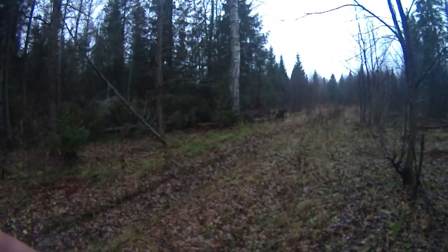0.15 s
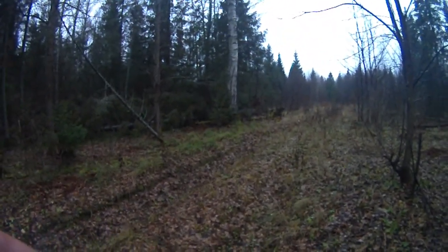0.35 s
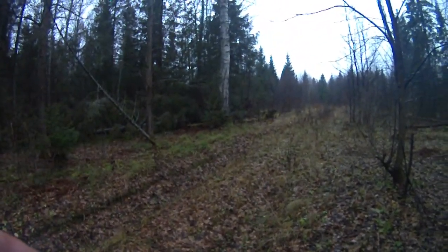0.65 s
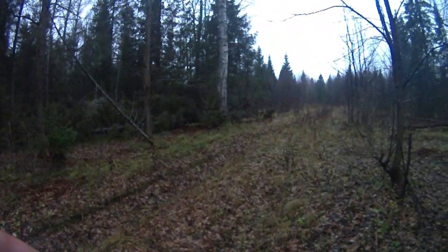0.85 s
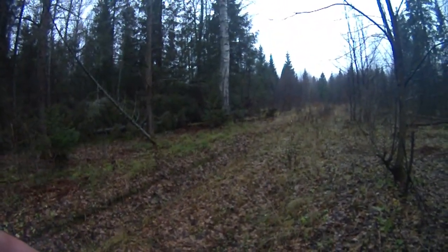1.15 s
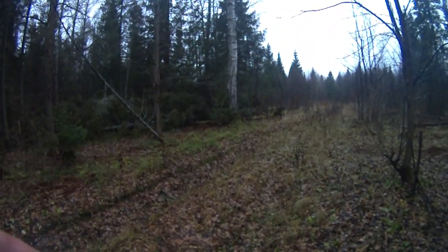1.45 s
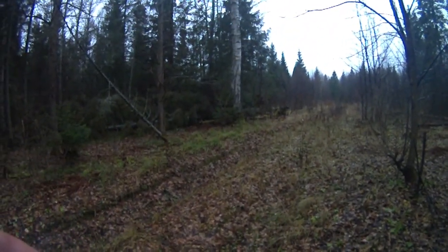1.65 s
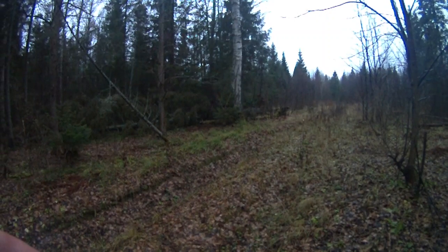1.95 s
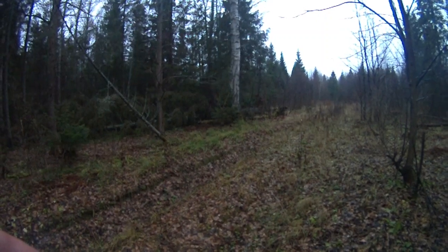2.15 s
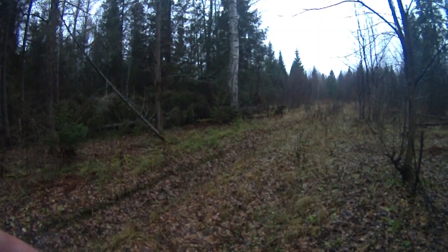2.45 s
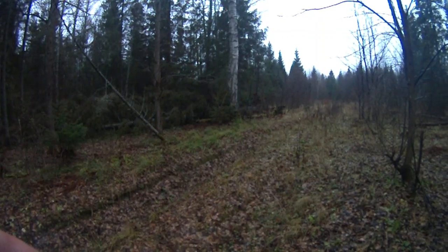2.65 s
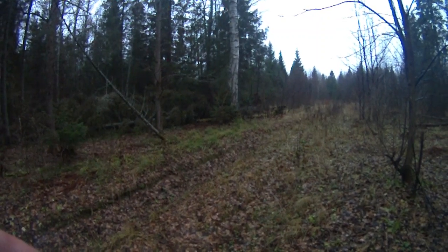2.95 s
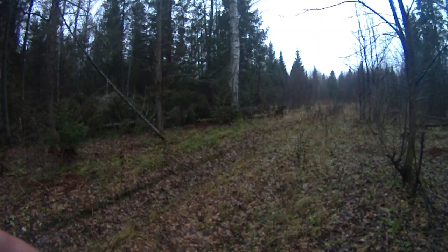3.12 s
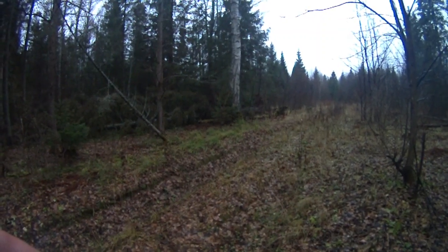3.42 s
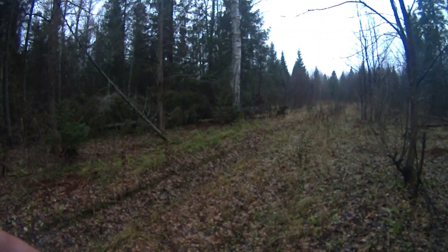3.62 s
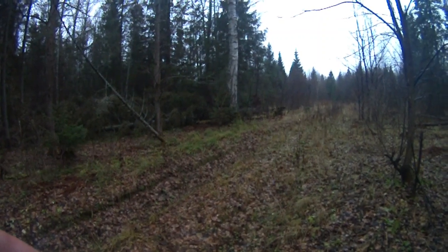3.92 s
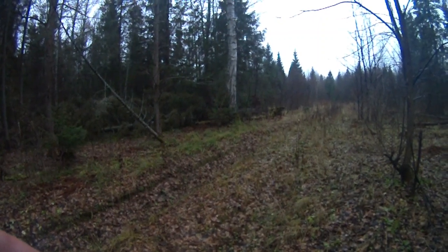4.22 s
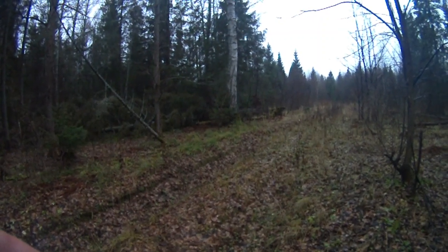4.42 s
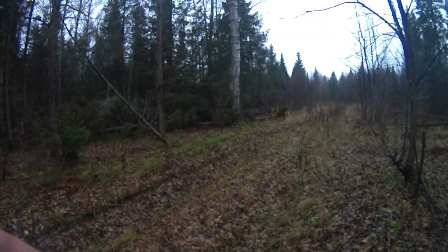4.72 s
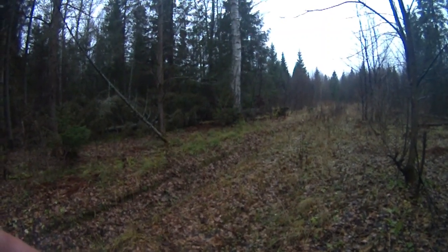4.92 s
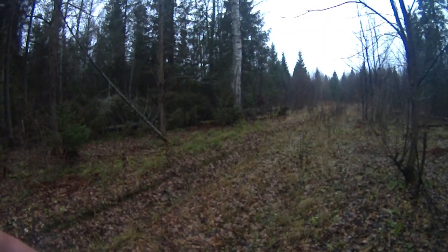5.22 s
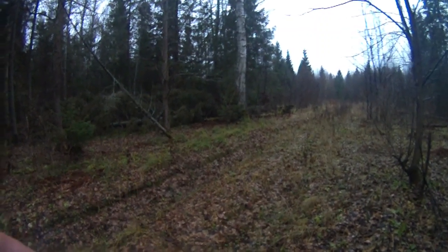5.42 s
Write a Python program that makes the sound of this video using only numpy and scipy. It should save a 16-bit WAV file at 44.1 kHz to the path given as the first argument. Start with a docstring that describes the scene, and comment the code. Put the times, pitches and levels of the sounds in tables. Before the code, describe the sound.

A faint, steady forest murmur and soft microphone hiss run throughout, with a barely audible high whistle. A small dull tap comes at the very start, over a fading echo. Far away, a hound gives short, slightly hoarse yelps at about 0.3, 0.7, 1.6, 2.1, 2.6 and 3.4 seconds. Most drop in pitch at the end; all are muffled by distance and leave a long echo among the trees. Two tiny dry ticks occur near 0.6 seconds and a brief, faint low hum near 1.1. After a pause, the dog yelps again at 4.5 seconds, gives a slightly longer, weaker call around 5.1, and one more faint yelp just before 5.5. At 5.5 seconds a small catch snaps shut close to the microphone, a sharp click with a very brief ring that stands out against the distant dog.

```python
"""Distant hound in the woods

A hound bays far off among the trees: short yelps, most of them falling, each answered by the forest
edge and a long tail scattered from the trunks. The woods murmur and the microphone pair hisses, with
a faint whistle, hum and ticks. At the end a catch snaps shut close by, its modes ringing briefly."""
import sys
import numpy as np
from scipy import signal
from scipy.fft import rfft, irfft, next_fast_len
from scipy.io import wavfile

SR = 44100
rng = np.random.default_rng(int(sys.argv[2]) if len(sys.argv) > 2 else 0)


def wav_record(signal):
    """Record a signal, one row per channel, as 16-bit PCM in the file named by sys.argv[1]."""
    frames = np.transpose(np.atleast_2d(signal))
    bounded = np.clip(frames, -1, 1)
    # unit amplitude maps onto the largest positive 16-bit level
    quanta = np.round(bounded * 32767).astype(np.int16)
    wavfile.write(sys.argv[1], SR, quanta)


N = 245725
TIME = np.arange(N) / SR
PATH_TIME = np.arange(3 * SR) / SR   # an echo path is over after three seconds


def from_db(db):
    """Decibels to amplitude."""
    return 10 ** (np.asarray(db) / 20)


def rms_one(x):
    """The signal scaled to rms 1."""
    return x / np.sqrt(np.mean(x ** 2))


def at_hz(points, hz):
    """A curve of (frequency, value) points, read along a logarithmic frequency axis."""
    frequencies, values = np.array(points).T
    return np.interp(np.log(hz), np.log(frequencies), values)


def filtered(x, order, hz, kind="low"):
    """A maximally flat filter, low-pass by default."""
    return signal.sosfilt(signal.butter(order, hz, kind, fs=SR, output="sos"), x)


def wobble(hz):
    """Slow noise of rms 1, changing mostly below hz."""
    return rms_one(filtered(rng.standard_normal(N), 2, hz))


def ring(drive, hz, t60):
    """A damped mode: a unit click sets a sine of height 1 ringing."""
    radius, angle = from_db(-60 / (t60 * SR)), 2 * np.pi * hz / SR
    return signal.lfilter([0, np.sin(angle)], [1, -2 * radius * np.cos(angle), radius ** 2], drive + 1e-18)


def stereo_noise(spectrum):
    """Noise of rms 1 with this spectrum, the sides as alike as the microphone pair makes them."""
    # width of the pair: f/Hz, side against mid/dB
    side_level = [(25, -36), (60, -29), (150, -27.5), (400, -23.5), (1000, -22.5), (2500, -7.5),
                  (5000, -5.5), (9000, -3.5), (14000, -4.5)]
    size = next_fast_len(N)
    hz = np.fft.rfftfreq(size, 1 / SR).clip(1)
    mid, side = rfft(rng.standard_normal((2, size)))
    pair = mid + from_db(at_hz(side_level, hz)) * side * [[1], [-1]]
    return rms_one(irfft(pair * from_db(at_hz(spectrum, hz)), size)[:, :N])


def microphone_hiss(level_db=-60):
    """The steady noise of the microphones themselves."""
    # hiss spectrum: f/Hz, relative density/dB
    spectrum = [(700, -23), (1500, 1), (2500, -2), (5000, -6), (10000, -11.5), (15400, -12.5)]
    return from_db(level_db) * stereo_noise(spectrum)


def woods_murmur(level_db=-55):
    """The far murmur of the woods, strongest in the low middle."""
    # murmur spectrum: f/Hz, relative density/dB
    spectrum = [(18, -52), (30, -26), (110, -19.5), (200, -9.5), (350, -3), (480, -1), (800, -8.5),
                (1100, -8), (1500, -16.5), (2200, -25.5), (4000, -27)]
    return from_db(level_db) * stereo_noise(spectrum)


def faint_whistle(hz=11145, level_db=-84):
    """A thin, high whistle: noise in one narrow resonance."""
    return from_db(level_db) * rms_one(ring(rng.standard_normal(N), hz, t60=0.042))


def short_hum(start_s=1.09, end_s=1.21, hz=212, level_db=-56):
    """A low tone swells and fades once."""
    arch = np.sin(np.pi * np.clip((TIME - start_s) / (end_s - start_s), 0, 1))
    return from_db(level_db) * arch * np.sin(2 * np.pi * hz * TIME)


def ticks():
    """A dull tap and two dry ticks, each a tone under a very short bell-shaped envelope."""
    # tap and ticks: t/s, f/Hz, level/dB, half length/s
    pulses = [(.0237, 640, -30.5, 0.00083), (.6255, 6690, -47, 0.00043), (0.635, 7380, -46, 0.00042)]
    out = np.zeros(N)
    for at_s, hz, level_db, half_s in pulses:
        t = TIME - at_s
        out += from_db(level_db) * np.exp(-(t / half_s) ** 2) * np.cos(2 * np.pi * hz * t)
    return out


def catch(contact_hz=3520, bass_cut_hz=1050):
    """Close by, each contact rings all modes through a short soft pulse; so small a part has no bass."""
    # contacts of the catch: t/s, level/dB
    snaps = [(5.4804, -37), (5.5057, -8)]
    # its modes: f/Hz, level/dB, t60/s
    modes = [(1065, -4, 0.0061), (1310, -5.5, 0.022), (1850, 3, 0.011), (2087, -3, 0.021),
             (2480, -5.5, 0.024), (3070, -6.5, 0.0096), (3570, -9.5, 0.014), (4460, -14, 0.0086),
             (5550, -12.5, 0.0079), (6040, -15.5, 0.012), (7080, -13, 0.0087), (11000, -3.5, 0.0051)]
    clicks = np.zeros(N)
    for at_s, level_db in snaps:
        clicks[round(at_s * SR)] = from_db(level_db)
    pulses = filtered(clicks, 2, contact_hz)
    ringing = sum(from_db(level_db) * ring(pulses, hz, t60) for hz, level_db, t60 in modes)
    return filtered(ringing, 6, bass_cut_hz, "high")


def forest_tail(time):
    """Noise that dies band by band as the trunks scatter and swallow it."""
    # decay among the trees: f/Hz, t60/s
    decay = [(300, 0.83), (600, 1.65), (1000, 2.4), (1600, 3.8), (2400, 0.3)]
    out, edges_hz = 0, 200 * 2 ** np.arange(0, 4.1, .5)
    for low, high in zip(edges_hz, edges_hz[1:]):
        band = filtered(rng.standard_normal(len(time)), 2, [low, high], "band")
        out += band * from_db(-60 * time / at_hz(decay, np.sqrt(low * high)))
    return out


def scatter(delay_s, t60):
    """A cluster of reflections from many trunks."""
    after = PATH_TIME - delay_s
    return rng.standard_normal(len(after)) * (after > 0) * from_db(-60 * np.abs(after) / t60)


def forest(yelp, near_db=-12, edge_db=-9, tail_db=-3.5):
    """Direct sound, near trunks, far edge and long tail; the hound runs, so each yelp finds new paths."""
    out = np.pad(yelp, (0, len(PATH_TIME) - 1))
    near, edge = scatter(delay_s=.004, t60=.15), scatter(delay_s=.084, t60=.51)
    for path, level_db in (near, near_db), (edge, edge_db), (forest_tail(PATH_TIME), tail_db):
        echo = signal.fftconvolve(yelp, path)
        # each level is the echo's energy against the direct sound
        out += from_db(level_db) * echo * np.sqrt(np.sum(yelp ** 2) / np.sum(echo ** 2))
    return out


def throat(x):
    """The hound's throat: parallel resonances, each applied twice so that the valleys stay dark."""
    # resonances: f/Hz, width/Hz, level/dB
    formants = [(534, 190, 7.5), (895, 434, 3.5), (1500, 890, -31)]
    out = 0
    for hz, width_hz, level_db in formants:
        radius, angle = np.exp(-np.pi * width_hz / SR), 2 * np.pi * hz / SR
        gain = (1 - radius ** 2) / 2
        section = [gain, 0, -gain, 1, -2 * radius * np.cos(angle), radius ** 2]
        out += from_db(level_db) * signal.sosfilt([section, section], x)
    return out


def lingering_tail(opening_db=-53):
    """Yelps already dying away among the trees at the start: a throat-coloured forest tail."""
    tail = throat(forest_tail(TIME))
    return from_db(opening_db) * tail / np.std(tail[:SR // 10])


def yelp_pitch(t, first_hz, held_hz, last_hz, break_s, settle_s=.028, break_length_s=.04, sag_share=.2):
    """The voice settles from the first pitch, drifts while held, then breaks to the last."""
    broken = np.clip((t - break_s) / break_length_s + .5, 0, 1)
    sag = sag_share * np.minimum(t / break_s, 1)
    step = (1 - sag_share) * broken ** 2 * (3 - 2 * broken)
    return held_hz + (first_hz - held_hz) * np.exp(-t / settle_s) + (last_hz - held_hz) * (sag + step)


def swell(t, level_db, slopes, from_s, until_s=None):
    """Gain that rises to full at from_s, holds if until_s is given, and fades, straight in dB."""
    rise, fade = slopes
    until_s = from_s if until_s is None else until_s
    return from_db(level_db - rise * np.maximum(from_s - t, 0) - fade * np.maximum(t - until_s, 0))


def hound(distance_hz=1650):
    """Far yelps: trembling partials and breath gated every cycle; air and leaves take the treble."""
    # yelps: t/s, length/s, first f/Hz, held f/Hz, last f/Hz, voice break/s, fundamental/dB, full from/s,
    # full until/s, octave's early swell/dB, its peak/s, octave at the break/dB, third partial/dB,
    # period-doubled line/dB, breath/dB; times after the first count from the yelp's start
    yelps = [ (0.251, .11, 530.2, 528.7, 407, 0.069, -44, 0.058, .09, -42.5, 0.03, -44, -54, -49, -44.5),
             (.72, 0.14, 527, 521.3, 388, 0.12, -40, 0.067, 0.14, -45.5, 0.019, -42, -56, -47.5, -41.5),
             (1.577, 0.13, 608.5, 497.7, 386.3, 0.087, -41.5, 0.012, 0.089, -47.5, .035, -39, -56, -47.5, -44),
             (2.117, 0.12, 622.4, 466.7, 399.3, .078, -41, 0.011, .05, -47.5, 0.037, -38.5, -55, -50, -45.5),
             (2.569, 0.12, 588, 502.6, 395.6, 0.093, -38, 0.035, .08, -47, 0.041, -45.5, -52.5, -54, -44),
             (3.361, .1, 521.4, 539.5, 418.3, 0.071, -43, 0.081, .085, -46.5, 0.047, -66, -56, -53.5, -47.5),
             (4.511, 0.098, 666, 606, 640, 0.072, -51, 0.019, .12, -64, .03, -75, -76, -80, -80),
             (4.541, 0.15, 537.6, 539.7, 557, 0.065, -41, 0.033, 0.063, -43.5, 0.016, -52.5, -54.5, -79, -46.5),
             (5.05, 0.22, 577.4, 526.3, 458.6, 0.16, -51.5, .01, 0.13, -55.5, 0.05, -74, -69, -57.5, -47),
             (5.455, 0.124, 595.5, 549, 457.5, .055, -52.5, 0.0034, .11, -70, .03, -49, -50.5, -61, -45)]
    # roughness of each yelp, 0-1: scales tremble and flutter
    roughness = [.5, .3, .7, .7, .6, .6, .1, .2, .9, .6]
    # swells of fundamental, octave, third partial, doubled line and breath: rise/(dB/s), fade/(dB/s)
    slopes = [(550, 450), (450, 300), (150, 300), (250, 250), (100, 80)]
    low_slopes, octave_slopes, third_slopes, doubled_slopes, breath_slopes = slopes
    out, air = np.zeros(N), rng.standard_normal(N)
    tremble = .015 * wobble(hz=60)   # of the pitch
    flutters = [.8 * wobble(hz=70) for _ in range(3)]   # of the upper partials' strength
    for row, rough in zip(yelps, roughness):
        start_s, length_s, first_hz, held_hz, last_hz, break_s, low_db, from_s, until_s = row[:9]
        early_db, early_s, late_db, third_db, doubled_db, breath_db = row[9:]
        on = np.flatnonzero((TIME >= start_s) & (TIME < start_s + length_s))
        t = TIME[on] - start_s
        hoarsest_s, late_s = .57 * length_s, break_s + .018
        hz = yelp_pitch(t, first_hz, held_hz, last_hz, break_s) * (1 + rough * tremble[on])
        phase = 2 * np.pi * np.cumsum(hz) / SR
        octave = swell(t, early_db, octave_slopes, early_s) + swell(t, late_db, octave_slopes, late_s)
        third = swell(t, third_db, third_slopes, late_s)
        doubled = swell(t, doubled_db, doubled_slopes, hoarsest_s)
        partials = swell(t, low_db, low_slopes, from_s, until_s) * np.sin(phase)
        for ratio, gain, flutter in zip((2, 3, 3 / 2), (octave, third, doubled), flutters):
            partials += gain * (1 + rough * flutter[on]) * np.sin(ratio * phase)
        puffs = (1 + np.sin(phase)) * air[on]
        breath = swell(t, breath_db, breath_slopes, hoarsest_s) * rms_one(throat(puffs))
        yelp = signal.windows.tukey(len(on), .21) * (np.sqrt(2) * partials + breath)
        heard = forest(yelp)[:N - on[0]]
        out[on[0]:on[0] + len(heard)] += heard
    return filtered(out, 4, distance_hz)


def scene():
    """Hound, catch and small sounds sit in the centre, the murmur almost so; only the hiss spreads wide."""
    centre = hound() + lingering_tail() + catch() + ticks() + short_hum() + faint_whistle()
    return centre + woods_murmur() + microphone_hiss()


def record(dry):
    """The recorder cuts the top steeply: 60 dB down from 15.4 kHz."""
    return signal.sosfilt(signal.cheby2(22, 60, 15400, fs=SR, output="sos"), dry)


dry = scene()
out = record(dry)
wav_record(out)
```